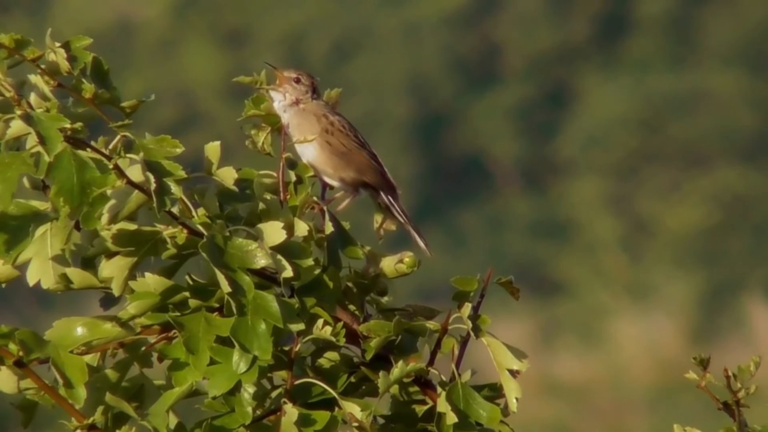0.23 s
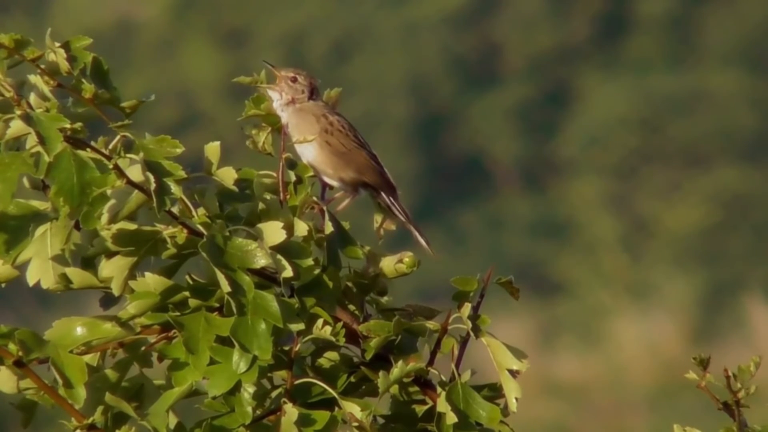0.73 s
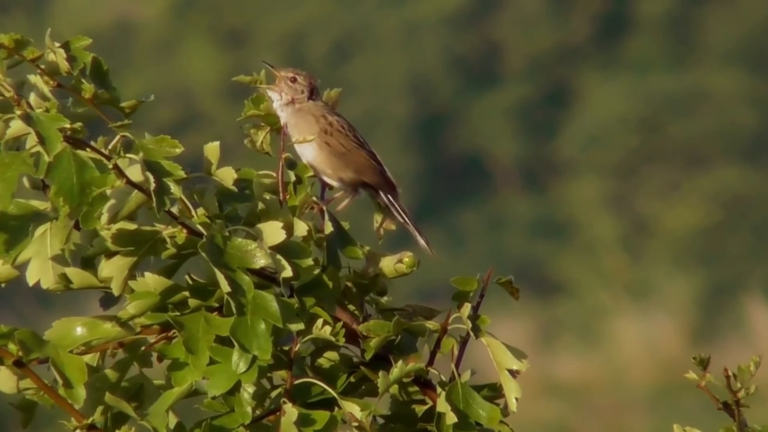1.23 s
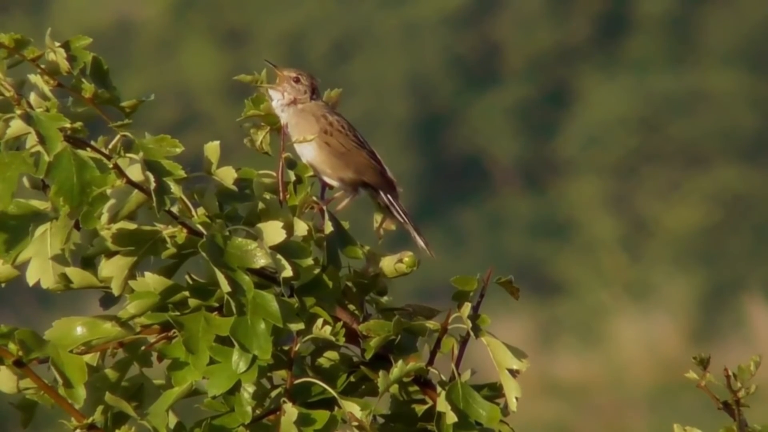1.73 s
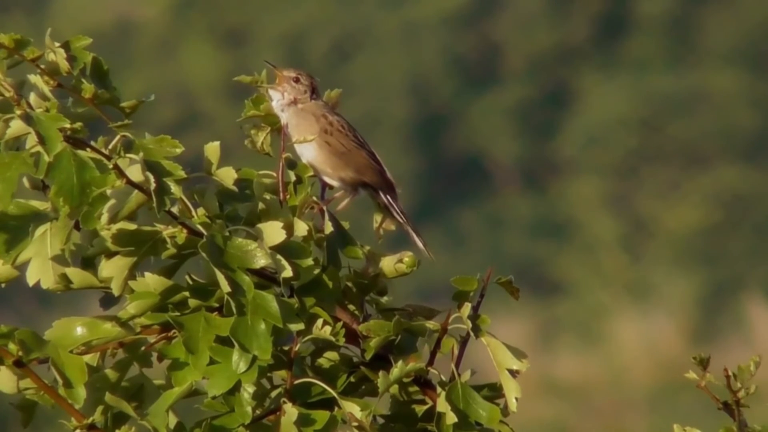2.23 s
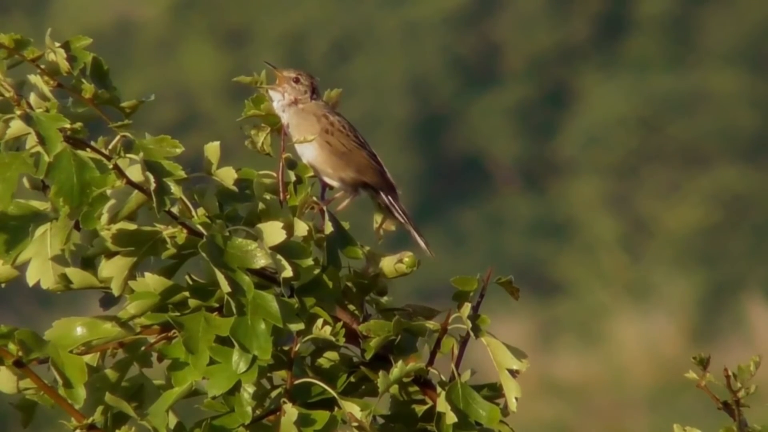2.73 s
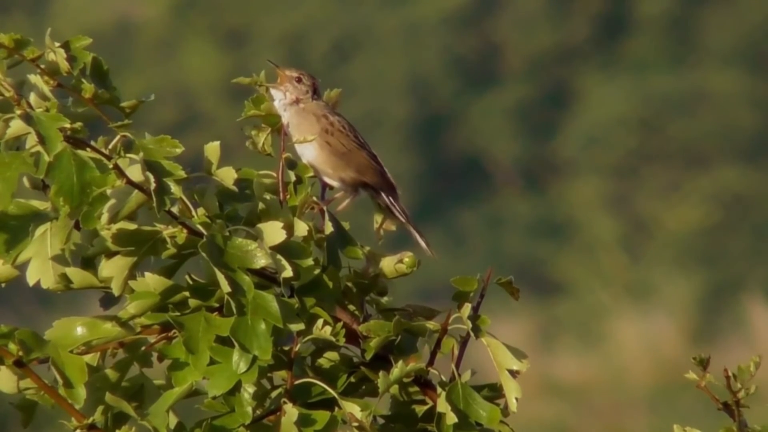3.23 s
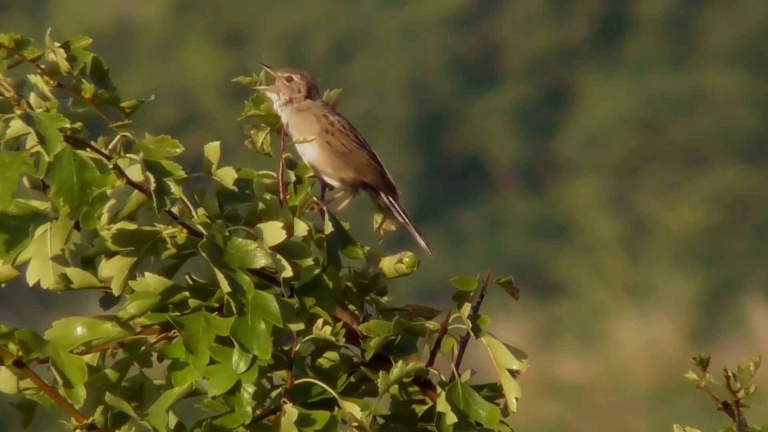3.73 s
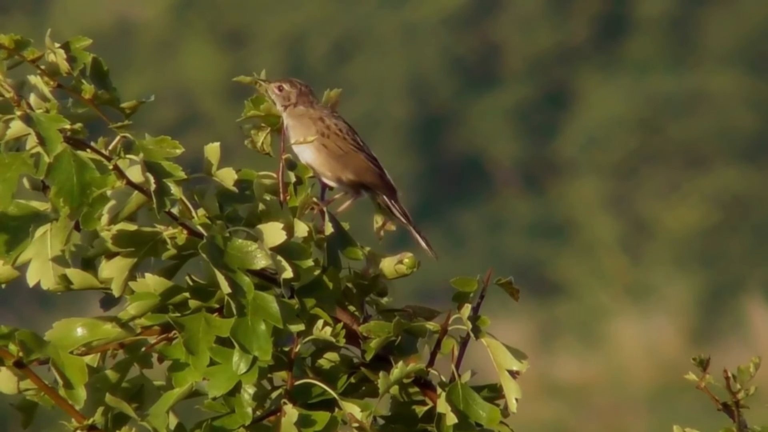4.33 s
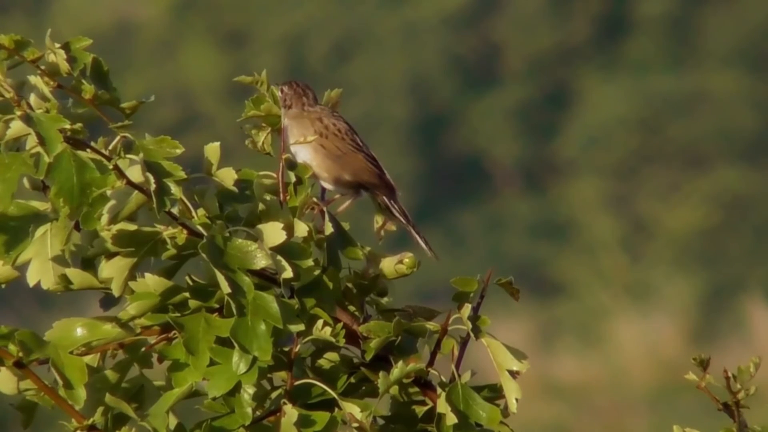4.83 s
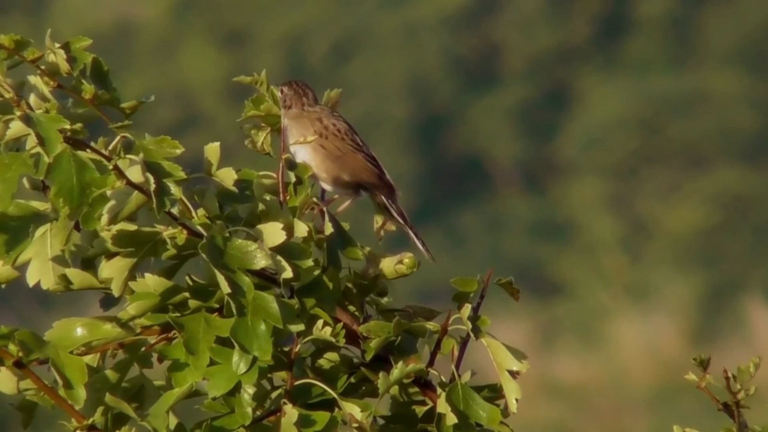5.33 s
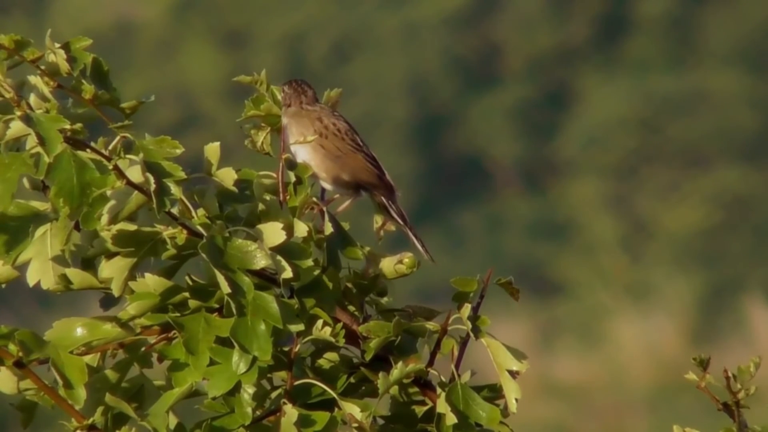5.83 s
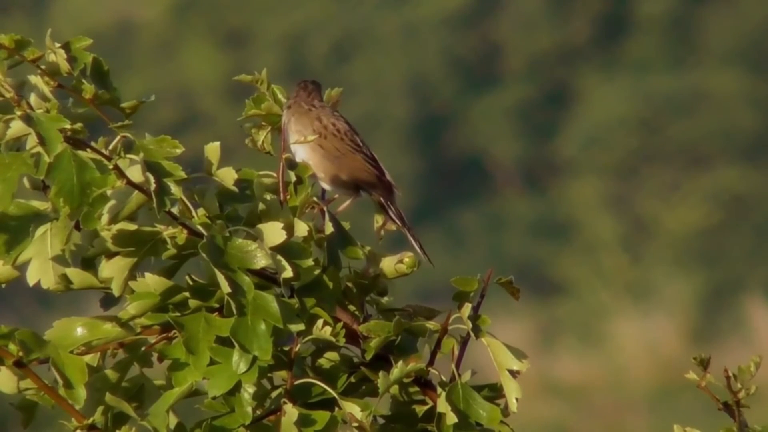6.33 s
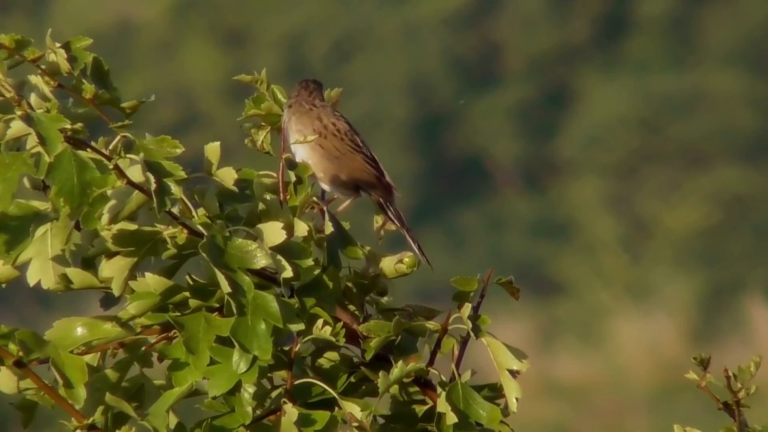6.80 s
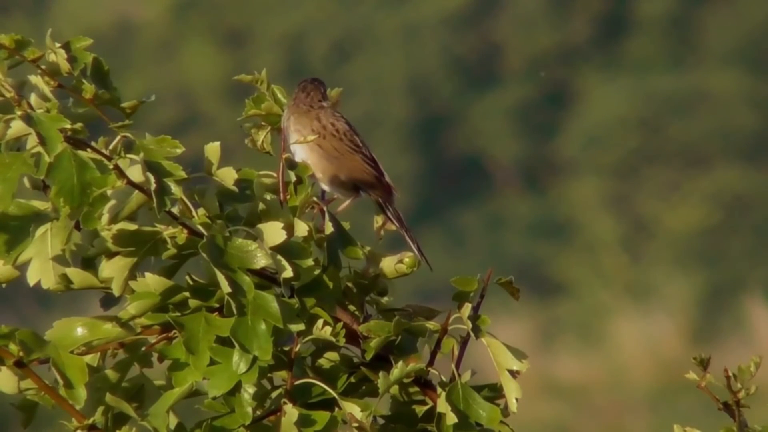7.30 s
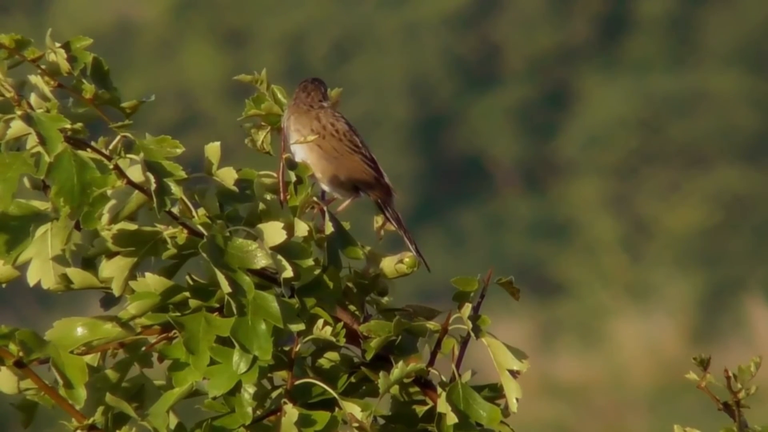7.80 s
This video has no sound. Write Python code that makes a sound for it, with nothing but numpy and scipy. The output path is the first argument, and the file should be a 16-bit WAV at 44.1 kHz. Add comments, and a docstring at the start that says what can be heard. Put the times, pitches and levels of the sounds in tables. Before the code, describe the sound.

Fast, metallic, cricket-like bird reeling swells, stops and restarts twice outdoors, while a far-off crow roost murmurs hoarsely beneath faint hush and hiss.

```python
"""Warbler reeling, crows far off

A small warbler reels from a hedge top: three bursts of about 26 syllables a second, each built from
a windowed-sine tick and gliding sines for a rising chip, a falling whistle and a faint afternote.
Far off, a crow roost caws and chacks in wavering stacks of partials. Noise tails give the echoes. Shaped
noise makes open-air hush, light wind on the microphone and its hiss; steady sines make mains hum."""
import sys
import numpy as np
from scipy import signal
from scipy.fft import rfft, irfft
from scipy.io import wavfile
from scipy.ndimage import uniform_filter1d

SR = 44100
rng = np.random.default_rng(int(sys.argv[2]) if len(sys.argv) > 2 else 0)


def dump_mix(stems):
    """Bounce the given channels to the path in sys.argv[1] as a 16-bit WAV at rate SR."""
    frames = np.atleast_2d(stems).T  # one column per channel
    limited = np.clip(frames, -1, 1)  # hard clip at full scale
    pcm = np.round(limited * 32767).astype(np.int16)
    wavfile.write(sys.argv[1], SR, pcm)


N = 355446

# How louder singing reshapes a syllable; chip, tick and afternote levels are relative to the whistle.
# Each row: whistle level in dB, whistle start pitch in Hz, whistle length in ms, chip level in dB,
# chip pitch in Hz, tick level in dB, afternote level in dB.
EFFORT_TRAITS = [(-28, 5880, 2.8, -5, 7100, -34.5, -14), (-21, 5950, 3.2, -7, 7200, -38, -27),
                 (-13.5, 5980, 3.44, -8.5, 7030, -24.5, -25), (-9.5, 5964, 3.5, -3, 6386, -22.5, -21.5),
                 (-4, 5856, 4.26, 0.5, 6087, -22, -18.5)]
SONG_LOWPASS_HZ, HAZE_DB, SHIMMER_DB = 9100, -28.5, -60.5


def warbler():
    """One template for all syllables, bent by effort and varied a little by chance."""
    out = np.zeros(N)
    effort_db, *traits = np.transpose(EFFORT_TRAITS)
    for s, db in syllables():
        start_hz, length_ms, chip_db, chip_hz, tick_db, after_db = (
            np.interp(db, effort_db, trait) for trait in traits)
        phase = rng.standard_normal()  # in turns, shared by whistle and afternote
        lead = s + .31 * rng.standard_normal() / 1000  # chip and ticks shift together
        add_note(out, s, whistle(db, start_hz, length_ms, phase))
        add_note(out, lead, chip(db + chip_db, chip_hz, length_ms))
        add_note(out, s, afternote(db + after_db, phase))
        add_ticks(out, lead, db + tick_db)
    # a faint high noise follows the loudness of the song
    haze = uniform_filter1d(np.abs(out), size=700) * cut(rng.standard_normal(N), 3000, "high")
    out = out + undb(HAZE_DB) * haze
    # a very faint high shimmer an octave up, added to the song
    loud = uniform_filter1d(np.abs(out), size=31) + 1e-3
    shimmer = cut(out ** 2 / loud, SONG_LOWPASS_HZ, "high")
    # a low-pass, run twice, dulls the song above its band
    song = cut(cut(out, SONG_LOWPASS_HZ, "low"), SONG_LOWPASS_HZ, "low")
    return song + undb(SHIMMER_DB) * shimmer


# The syllables where tempo or swell turns, listed burst by burst; the rest are spaced evenly between.
# Each row: whistle onset in seconds, whistle peak level in dB, both before the small chance shifts.
BURST_TURNS = [
    [(.0027, -32), (.077, -25.5), (.1933, -21), (.3467, -12.5), (.7276, -7.5), (1.2238, -5), (1.4534, -7)],
    [(2.7185, -33), (2.7549, -29.5), (2.9455, -12.5), (3.1361, -8.5), (3.1765, -11), (3.253, -13),
     (3.3687, -9), (3.9805, -6), (4.2093, -5.5)],
    [(4.9197, -21), (4.9939, -15), (5.1468, -10.5), (5.4133, -7), (5.9836, -5.5), (6.67, -5.5),
     (7.2042, -5), (7.5105, -4), (8.01, -4.5), (8.0462, -5)],
]
SYLLABLE_S, LAST_LATE_S = .0382, .0033
JITTER_MS, JITTER_DB = .2, .5


def syllables():
    """Onset and level of every syllable: an even beat, a little unsteady, the last of a burst dragging."""
    rows = []
    for burst in BURST_TURNS:
        s, db = np.transpose(burst)
        beat = np.cumsum(np.rint(np.diff(s, prepend=s[0]) / SYLLABLE_S))
        every = np.arange(beat[-1] + 1)
        onset = np.interp(every, beat, s) + LAST_LATE_S * (every == beat[-1])
        rows += zip(onset, np.interp(every, beat, db))
    return np.array(rows) + rng.standard_normal((len(rows), 2)) * [JITTER_MS / 1000, JITTER_DB]


# The swell and fade of the whistle.
# Each row: position as a share of the whistle length, level in dB against the syllable level.
WHISTLE_SHAPE = [(-.1, -24), (.06, -.5), (.42, .8), (.8, -1.5), (1.05, -5), (1.2, -16), (1.35, -15),
                 (1.7, -27)]
FULL_MS = 4.5  # the length that sets the attack, whatever the effort
WHISTLE_FALL_HZ_PER_MS, WHISTLE_END_HZ = 133, 5700


def whistle(db, start_hz, length_ms, phase):
    """A tone whose pitch falls steadily from the onset and springs back in the faint end."""
    share, shape_db = np.transpose(WHISTLE_SHAPE)
    # the attack keeps its length; weak whistles only end sooner
    ms = share * np.where(share < .1, FULL_MS, length_ms + .2 * rng.standard_normal())
    falling = start_hz + 35 * rng.standard_normal() - WHISTLE_FALL_HZ_PER_MS * ms
    return note(ms, np.where(share < 1.3, falling, WHISTLE_END_HZ), shape_db + db, phase)


# The glide of the chip that comes before the whistle.
# Each row: time in ms from the whistle onset, pitch offset in Hz, level in dB against the chip level.
CHIP_GLIDE = [(-13.05, -2200, -30), (-12.75, -1150, -10), (-12.4, -200, 1), (-11.8, 500, -3),
              (-10.7, 450, -12), (-9.5, 400, -28)]
CHIP_PEAK_MS = -12.4


def chip(db, chip_hz, length_ms):
    """A quick tone that leaps upward; after its peak, a weak one ends sooner."""
    ms, offset_hz, shape_db = np.transpose(CHIP_GLIDE)
    shorter = CHIP_PEAK_MS + (ms - CHIP_PEAK_MS) * (length_ms / FULL_MS) ** 3
    ms = np.where(ms > CHIP_PEAK_MS, shorter, ms)
    hz = offset_hz + chip_hz + 60 * rng.standard_normal()
    return note(ms, hz, shape_db + db + .69 * rng.standard_normal(), rng.standard_normal())


# The glide of the faint note after the whistle.
# Each row: time in ms from the whistle onset, pitch offset in Hz, level in dB against the afternote level.
AFTERNOTE_GLIDE = [(7.5, 150, -15), (9.8, 100, -12), (11.6, 0, 1), (12.7, -150, -7), (14.0, -200, -20)]
AFTERNOTE_HZ = 5630


def afternote(db, phase):
    """A faint tone that sinks slightly in pitch."""
    ms, offset_hz, shape_db = np.transpose(AFTERNOTE_GLIDE)
    return note(ms, offset_hz + AFTERNOTE_HZ, shape_db + db + rng.standard_normal(), phase)


TICK_LOW_HZ, TICK_HIGH_HZ, TICK_HIGH_DB = 4400, 6900, -5  # each pitch varies a little by chance
TICK_MS, TICK_SPREAD_MS, TICK_WIDTH_MS = -17.4, .3, .22


def add_ticks(out, lead, db):
    """The valve cracks open in a low and a high snap of a few cycles."""
    t = np.arange(-40, 40) / SR
    window = np.exp(-.5 * (t * 1000 / TICK_WIDTH_MS) ** 2)
    for hz, part_db in ((TICK_LOW_HZ, 0), (TICK_HIGH_HZ, TICK_HIGH_DB)):
        late, size, sharp = rng.standard_normal(3)
        tick = window * np.sin(2 * np.pi * hz * (1 + .06 * sharp) * t)
        start = lead + (TICK_MS + TICK_SPREAD_MS * late) / 1000 + t[0]
        add(out, start, tick * undb(db + part_db + size))


CALLS_HIGHPASS_HZ = 1110


def crows():
    """Caws and chacks together; a high-pass leaves the calls thin, without bass."""
    return cut(caws() + chacks(), CALLS_HIGHPASS_HZ, "high")


# Distant hoarse caws; the pitch also wavers around the glide.
# Each row: start in seconds, length in seconds, start pitch in Hz, top pitch in Hz, end pitch in Hz,
# level in dB of the main tone before its flutter.
CAW_CALLS = [(0.0, 0.14, 1880, 1814, 1710, -59.5), (.25, 0.11, 1540, 1647, 1430, -39.5),
             (.42, 0.42, 1600, 1725, 1518, -58.5), (1.33, 0.19, 1600, 1830, 1790, -61),
             (1.72, .23, 1350, 1800, 1800, -60), (2.07, .24, 1450, 1800, 1750, -58.5),
             (2.9, 0.073, 1910, 1860, 1490, -65.5), (2.42, 0.31, 1750, 1843, 1846, -58),
             (2.76, 0.24, 1740, 2035, 1920, -62), (3.1, 0.24, 1700, 2076, 1900, -57),
             (3.38, 0.36, 1950, 1980, 1850, -61), (3.96, 0.097, 1420, 1645, 1306, -41.5),
             (4.06, .1, 1426, 1380, 1356, -54.5), (4.18, 0.08, 3410, 3280, 2900, -63),
             (4.24, .13, 1650, 1980, 1650, -57), (4.55, 0.11, 1975, 2050, 1610, -53.5),
             (4.5, 0.1, 3530, 3780, 3770, -62.5), (4.64, 0.086, 3660, 3750, 3480, -67),
             (2.34, 0.056, 5000, 4900, 4850, -64), (3.68, 0.077, 3240, 3260, 3200, -63.5),
             (4.55, 0.23, 1350, 1416, 1320, -59), (4.78, 0.38, 1567, 1800, 1750, -57.5),
             (4.82, 0.19, 2400, 2540, 2500, -60), (5.36, 0.29, 1825, 2090, 2060, -58),
             (5.53, 0.12, 1836, 2000, 1640, -55.5), (5.42, 0.11, 1654, 1663, 1570, -58.5),
             (5.35, 0.3, 2390, 2500, 2470, -60), (5.72, 0.37, 1720, 1880, 1760, -55.5),
             (6.07, 0.15, 1866, 2060, 1580, -50), (6.35, 0.38, 1700, 1837, 1660, -55),
             (6.55, 0.29, 1700, 2150, 1570, -55.5), (6.78, 0.64, 1686, 1732, 1753, -58.5),
             (7.2, 0.57, 2400, 2320, 2080, -59), (7.18, 0.33, 1200, 1224, 1100, -63),
             (7.4, 0.37, 1720, 1705, 1700, -58.5), (7.7, 0.15, 2040, 2120, 2080, -57),
             (7.76, .29, 1900, 1773, 1576, -49)]
CAW_BELOW_DB, CAW_ABOVE_DB = -6.5, -7  # fifth and seventh partial against the sixth, which carries the pitch


def caws():
    """Gliding arches of pitch; the fainter a caw, the further off and the more smeared it is."""
    out = np.zeros(N)
    pitch, size, rasp = wobble(150), wobble(100), wobble(500)
    for k, (s, length_s, start_hz, top_hz, end_hz, db) in enumerate(CAW_CALLS):
        u, env = arch(length_s, .35)
        own = slice(8000 * k, 8000 * k + len(u))  # each call takes its own stretch of the wobbles
        smear = np.clip((-44 - db) / 20, .4, .7)
        before_top = (start_hz - top_hz) * (1 - u / .4) ** 2
        after_top = (end_hz - top_hz) * ((u - .4) / .6) ** 2
        hz = top_hz + np.where(u < .4, before_top, after_top)
        phase = 2 * np.pi * np.cumsum(hz * (1 + .022 * pitch[own])) / SR
        # a fluttering tone in a haze of rasp, between two weaker partials
        flutter = 1 - .4 * smear + .6 * smear * size[own] + .6 * smear * rasp[own]
        below = undb(CAW_BELOW_DB) * np.sin(phase * 5 / 6)
        above = undb(CAW_ABOVE_DB) * np.sin(phase * 7 / 6)
        sides = smear * (1 + .4 * rasp[own]) * (below + above)
        add(out, s, undb(db) * env * (flutter * np.sin(phase) + sides))
    return out


# Short harsh chacks; each arches up to its pitch and wavers around it.
# Each row: start in seconds, top pitch of the first partial in Hz, level of the second partial in dB
# before its flutter, extra level of the noisy upper partials in dB.
CHACK_CALLS = [(.225, 973, -46, -7), (1.085, 1130, -55, -7), (1.23, 1050, -52, -12.5),
               (2.335, 958, -50, -4), (2.45, 1132, -54.5, -10.5), (3.115, 1059, -44.5, -2.5),
               (3.605, 1130, -55.5, -27.5), (3.67, 1070, -49.5, 4), (3.935, 998, -50.5, -15),
               (4.51, 950, -53.5, -3), (5.025, 1125, -53.5, -12), (7.165, 1115, -51.5, -2),
               (7.31, 1066, -54.5, -22)]
# Loudness of the noisy partials. Each entry: level in dB against the second partial, for the third to
# sixth, before the extra level of each call and the flutter.
CHACK_UPPER_LEVELS = [-5.5, -6.5, -2, -10]
CHACK_LOW_DB, CHACK_S = -16, .055  # first partial against the second; length of a chack


def chacks():
    """Stacks of six partials, the upper four roughened by fast flutter."""
    out = np.zeros(N)
    pitch, rasp, grit = wobble(150), wobble(500), wobble(1400)
    for k, (s, hz, db, upper_db) in enumerate(CHACK_CALLS):
        u, env = arch(CHACK_S, .6)
        own = slice(20000 * k, 20000 * k + len(u))
        phase = 2 * np.pi * np.cumsum(hz * (.87 + .13 * env) * (1 + .045 * pitch[own])) / SR
        low = (1 + .64 * rasp[own]) * (undb(CHACK_LOW_DB) * np.sin(phase) + np.sin(2 * phase))
        stack = sum(undb(p) * np.sin((j + 3) * phase) for j, p in enumerate(CHACK_UPPER_LEVELS))
        upper = (.6 + .7 * grit[own]) * stack
        add(out, s, undb(db) * env * (low + undb(upper_db) * upper))
    return out


HEDGE_DB, HEDGE_T60_S, FIELD_DB, FIELD_T60_S, ECHO_SIDE = -21.5, .1, -48.5, .28, .18


def echoes(x):
    """Leaves scatter a quick patchy tail, the field a longer faint one; partly different left and right."""
    t = np.arange(SR // 3) / SR
    hedge = undb(HEDGE_DB - 60 * t / HEDGE_T60_S + 1.5 * wobble(270)[:len(t)])
    field = undb(FIELD_DB - 60 * t / FIELD_T60_S)
    env = (hedge + field) * (t > .001) / 10
    mid, side = (signal.fftconvolve(x, env * rng.standard_normal(len(t)))[:N] for _ in range(2))
    return np.array([mid + ECHO_SIDE * side, mid - ECHO_SIDE * side])


def background():
    """Everything behind the birds, as left and right channels."""
    return hush() + hum() + wind() + hiss()


# Open-air hush with the murmur of the far roost, before it swells.
# Each row: frequency in Hz, noise density in dB per Hz.
HUSH_SPECTRUM = [(200, -108), (600, -114), (900, -111), (1300, -98), (1800, -93.5), (2400, -102),
                 (3200, -104), (7400, -104), (9500, -120)]


def hush():
    """Shaped noise that swells gently."""
    return coloured(HUSH_SPECTRUM) * undb(1.5 * wobble(4))


# The tones of the mains hum. Each row: frequency in Hz, average (RMS) level in dB.
HUM_TONES = [(102.3, -80.5), (150.7, -76.5), (247.6, -83), (796.7, -92.5)]


def hum():
    """Steady sines, each starting at a random point of its cycle."""
    t = np.arange(N) / SR
    return sum(np.sqrt(2) * undb(db) * np.sin(2 * np.pi * (hz * t + rng.random())) for hz, db in HUM_TONES)


# The rise and fall of the gusts. Each row: time in seconds, gain in dB applied to the rumble.
WIND_GUSTS = [(0.15, -85), (0.34, -65), (0.69, -72.5), (1.08, -64.5), (1.25, -80.5), (1.86, -74.5),
              (2.85, -84.5), (3.05, -62.5), (3.32, -81.5), (3.55, -74.5), (4.04, -67), (4.29, -84.5),
              (5.72, -64.5), (6.02, -77.5), (7.43, -69.5), (7.63, -65.5), (8.06, -63)]


def wind():
    """Low rumble of wind on the microphone, partly unlike at the two ports."""
    t = np.arange(N) / SR
    rumble = [(18, -18.5), (40, -19), (80, -20.5), (300, -40.5), (1000, -68)]  # Hz, dB per Hz before gusts
    mid, side = coloured(rumble), .33 * coloured(rumble)
    return undb(np.interp(t, *np.transpose(WIND_GUSTS))) * np.array([mid + side, mid - side])


# Microphone hiss in each channel. Each row: frequency in Hz, noise density in dB per Hz.
HISS_SPECTRUM = [(60, -100), (300, -114), (1200, -116), (4000, -113), (8000, -116), (10000, -119),
                 (15500, -119)]


def hiss():
    """Steady shaped noise, independent left and right."""
    return np.array([coloured(HISS_SPECTRUM), coloured(HISS_SPECTRUM)])


def undb(db):
    """Turns decibels into a plain gain."""
    return 10 ** (np.asarray(db) / 20)


def coloured(table):
    """Noise with the given density in dB per Hz, joined smoothly over log frequency."""
    hz, db = np.transpose(table)
    grid = np.log(np.linspace(1, SR / 2, N // 2 + 1))
    gain = undb(np.interp(grid, np.log(hz), db))
    return irfft(rfft(rng.standard_normal(N)) * gain, N) * np.sqrt(SR / 2)


def wobble(hz):
    """Random curve with spread 1 that turns about hz times a second."""
    k = int(SR / hz)
    return uniform_filter1d(uniform_filter1d(rng.standard_normal(N), k), k) * np.sqrt(1.5 * k)


def arch(length_s, sharp):
    """Position 0-1 through a call and its rounded envelope."""
    u = np.linspace(0, 1, int(length_s * SR))
    return u, np.sin(np.pi * u) ** sharp


def note(ms, hz, db, phase):
    """A sine gliding through time, pitch and level points, corners rounded; also its start in seconds."""
    t = np.arange(ms[0] - .5, ms[-1] + .5, 1000 / SR)
    gain = undb(np.interp(t, ms, db, -120, -120))
    gain = uniform_filter1d(uniform_filter1d(gain, size=11), size=11)
    glide = uniform_filter1d(np.interp(t, ms, hz), size=11)
    return gain * np.sin(2 * np.pi * (np.cumsum(glide) / SR + phase)), t[0] / 1000


def add(out, s, x):
    """Mixes x into out from time s on."""
    i = int(s * SR)
    a, b = max(i, 0), min(i + len(x), N)
    out[a:max(a, b)] += x[a - i:max(a, b) - i]


def add_note(out, s, sound):
    """Mixes in a note, given with its start relative to time s."""
    x, offset = sound
    add(out, s + offset, x)


def cut(x, hz, kind):
    """Steep high- or low-pass."""
    return signal.sosfilt(signal.butter(4, hz, kind, fs=SR, output="sos"), x)


def scene():
    """Birds, their echoes and the background."""
    birds = warbler() + crows()
    return birds + echoes(birds) + background()


STALL_S, STALL_LENGTH_S, TOP_HZ = 6.137, .014, 15700


def record(dry):
    """The left channel stalls one sample for a moment, caught on a wave trough, which clicks; the top is cut."""
    out = dry.copy()
    near = int(STALL_S * SR)
    first = near + 1 + np.argmin(dry[0, near:near + 10])  # lowest of ten samples is repeated
    last = first + int(STALL_LENGTH_S * SR)
    out[0, first:last] = dry[0, first - 1:last - 1]
    return signal.sosfilt(signal.ellip(8, .2, 70, TOP_HZ, fs=SR, output="sos"), out)


dry = scene()
out = record(dry)
dump_mix(out)
```